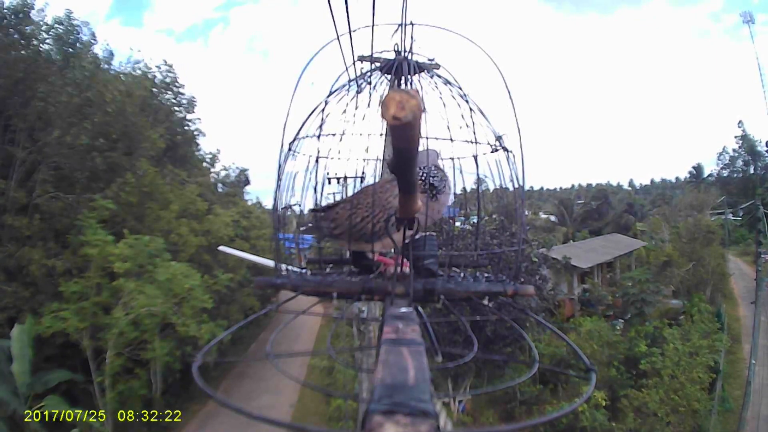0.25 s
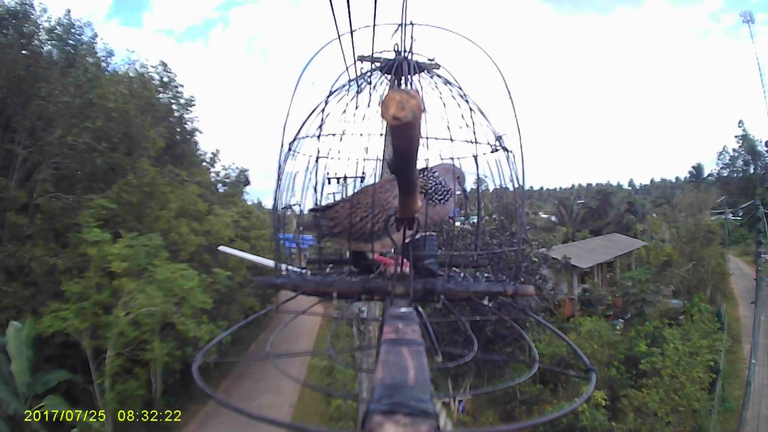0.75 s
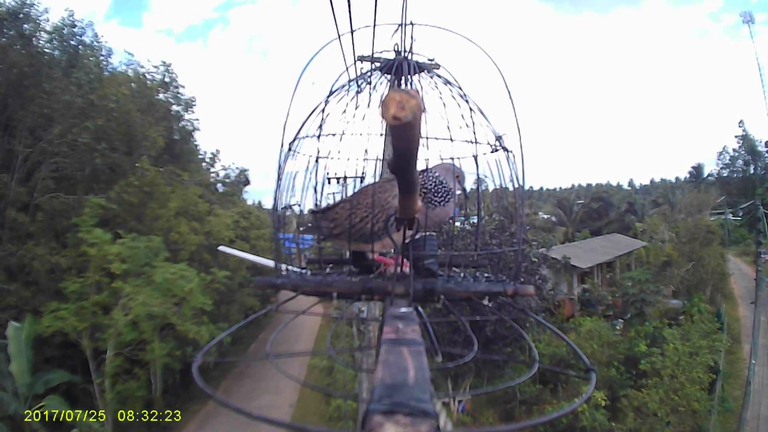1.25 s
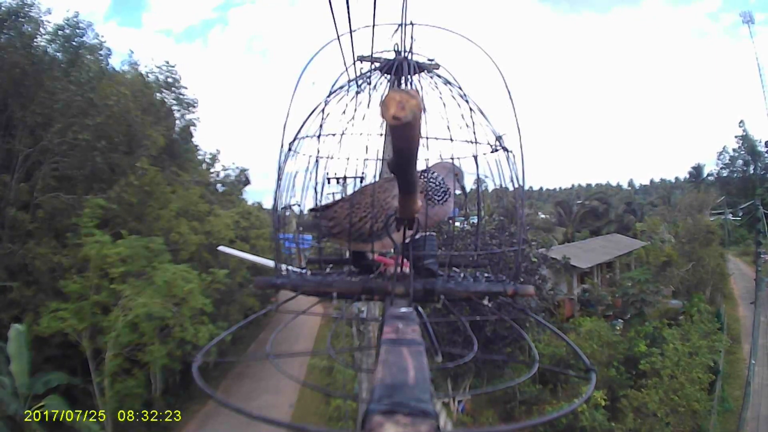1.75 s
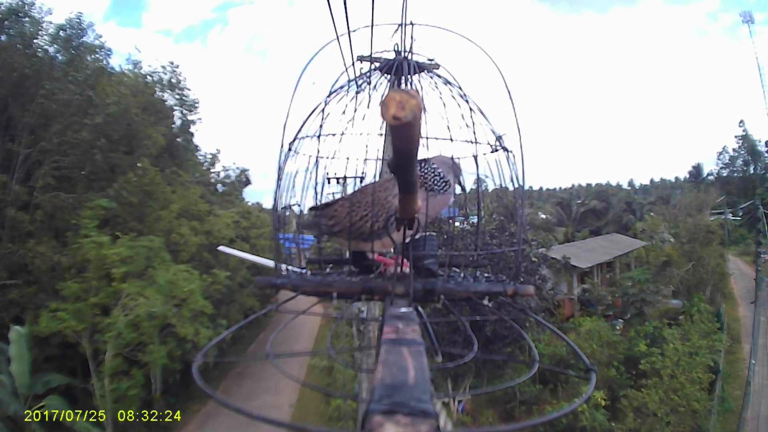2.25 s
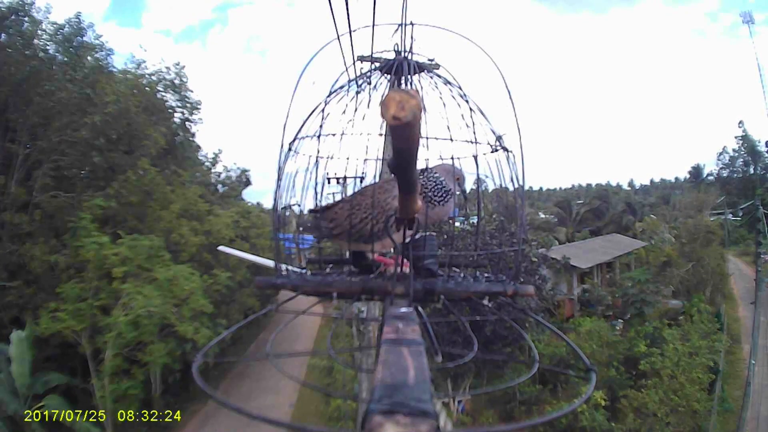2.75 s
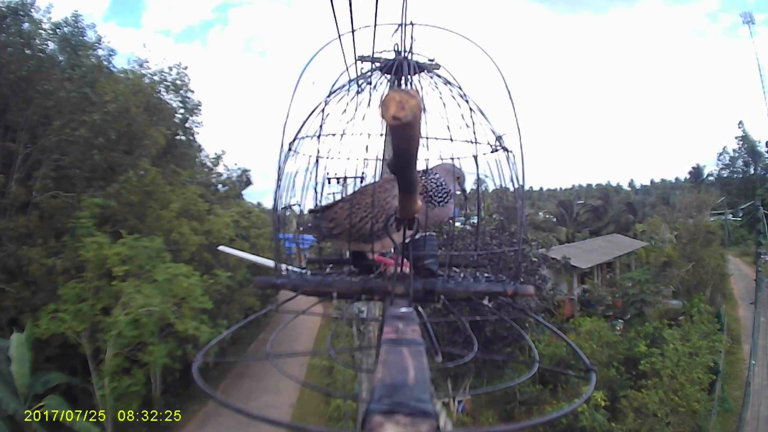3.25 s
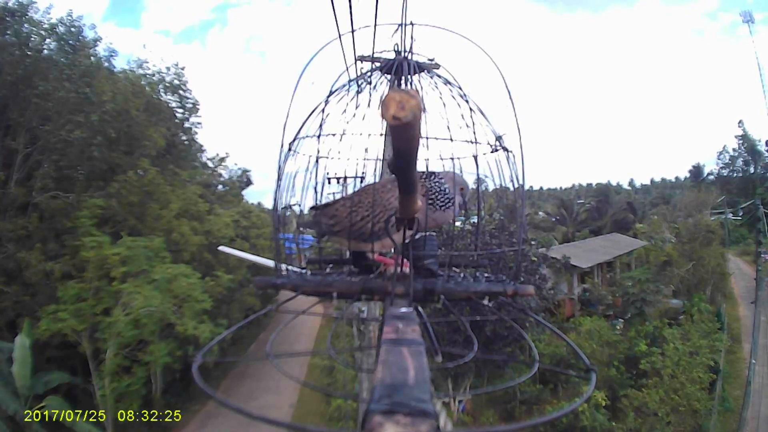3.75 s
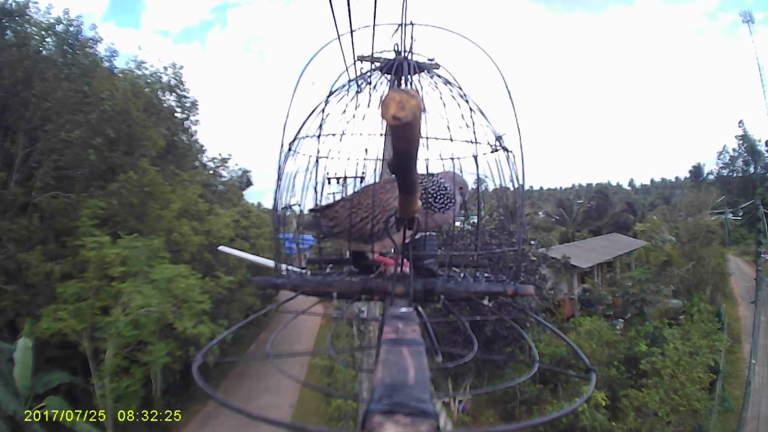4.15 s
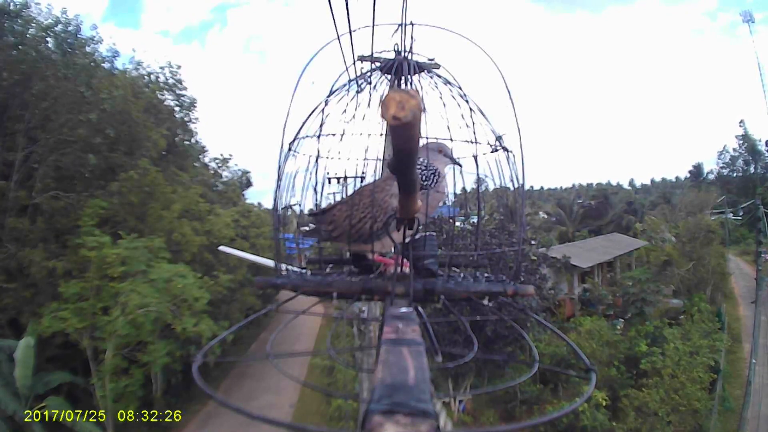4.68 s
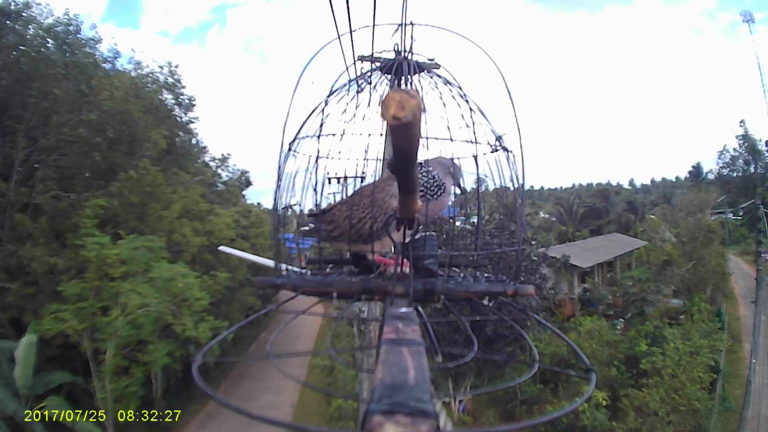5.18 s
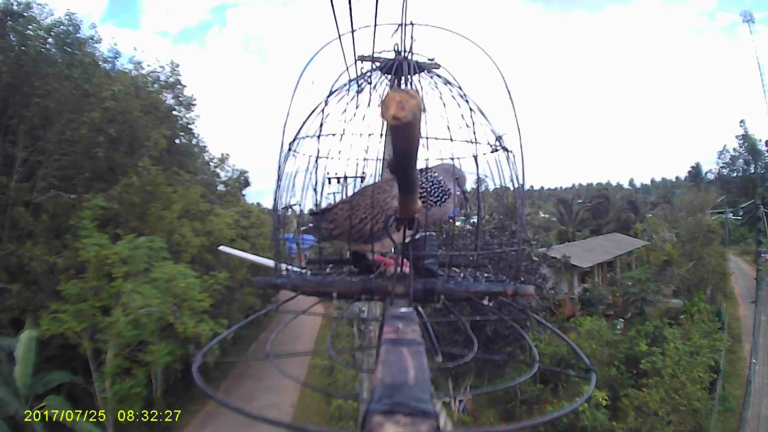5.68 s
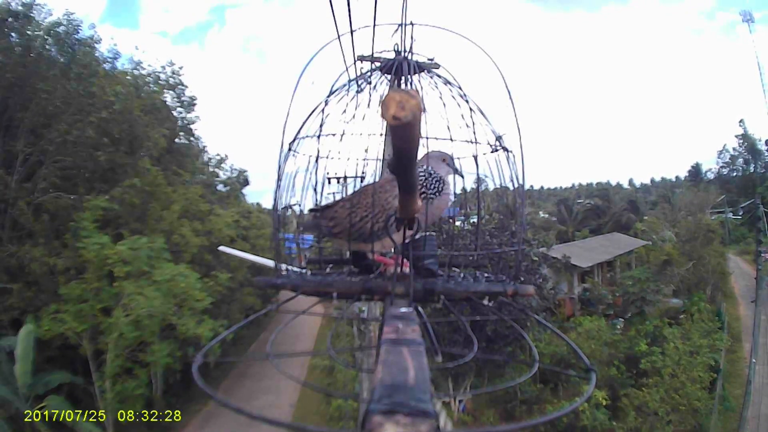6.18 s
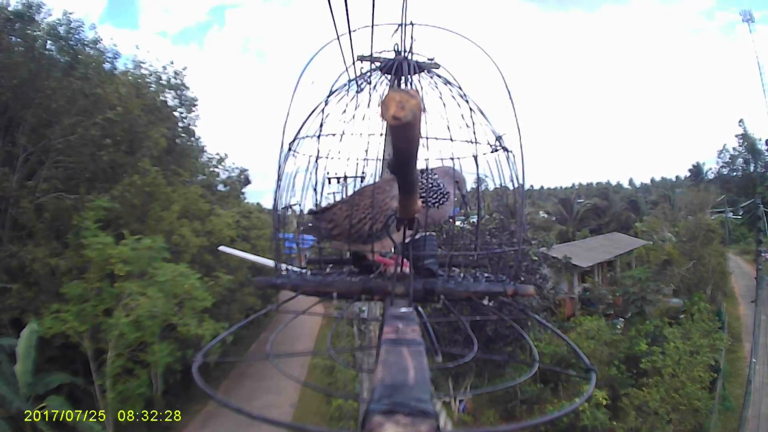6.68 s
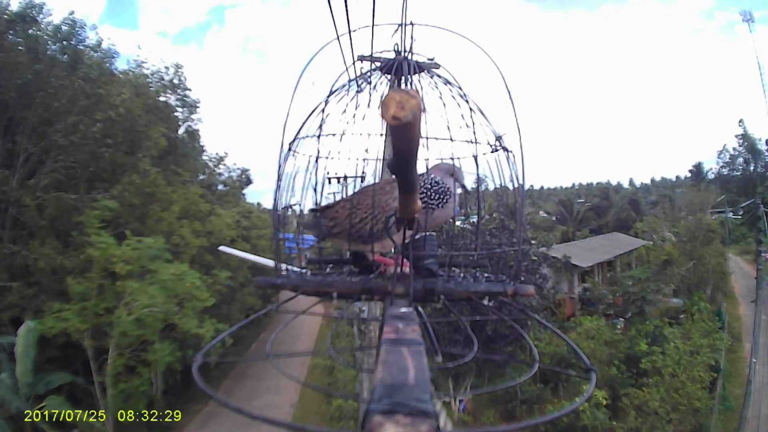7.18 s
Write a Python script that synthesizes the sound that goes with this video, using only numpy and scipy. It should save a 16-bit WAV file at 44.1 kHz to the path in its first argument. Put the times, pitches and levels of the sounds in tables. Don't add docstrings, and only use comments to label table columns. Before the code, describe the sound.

A dove's mellow, almost whistled coos come in pairs: a brief note that nearly vanishes and returns, then a longer rolling one with a rapid throb. Low wind buffets the unprotected microphone in lumpy bursts, with a calm patch early and a tearing blast just before five seconds. Soft distant bird calls, rustling foliage, and steady insect hiss lie far behind in the open air.

```python
import sys
import numpy as np
from scipy import signal
from scipy.io import wavfile
from scipy.ndimage import uniform_filter1d

SR = 44100
rng = np.random.default_rng(int(sys.argv[2]) if len(sys.argv) > 2 else 0)


def rack_gain(trim_db):
    fader = np.asarray(trim_db, float)
    return 10 ** (fader / 20)


def bounce(signal):
    frames = np.transpose(np.atleast_2d(signal))
    limited = np.clip(frames, -1, 1)
    pcm = np.round(limited * 32767).astype(np.int16)
    wavfile.write(sys.argv[1], SR, pcm)


N = 327663
COARSE = np.arange(0, N, 64)


def evened(x):
    return x / np.sqrt(np.mean(x ** 2) + 1e-20)


def smooth_rise(u):
    return .5 + .5 * np.tanh(u / 2)


def add(mix, s, sound):
    part = mix[max(round(s * SR), 0):][:len(sound)]
    part += sound[:len(part)]


def dove():
    # start [s], length [s], bright head [s], valley level [dB], closing crest [s].
    short_notes = [
        (0.78, .207, .05, -29, .03),
        (2.625, .253, .06, -37, .044),
        (3.863, .182, .034, -26, 0),
        (5.544, .255, .052, -34, .04),
        (6.872, .19, .05, -22, 0),
    ]
    # start [s], length [s], top pitch [Hz], held pitch [Hz], final fade [dB].
    long_notes = [
        (-0.195, .395, 700, 625, -18.5),
        (1.129, .391, 715, 630, -19),
        (3.033, .395, 705, 605, -16.5),
        (4.18, .346, 685, 655, -13),
        (5.952, .393, 695, 610, -18),
        (7.197, .39, 680, 670, -17),
    ]
    out, slipped = np.zeros(N), register_slips()
    for points in [dipping_note(*r) for r in short_notes] + [rolling_note(*r) for r in long_notes]:
        add(out, *coo(points, slipped))
    return out


def dipping_note(start, length, head, valley_db, crest):
    end = start + length
    breath = np.clip(crest / .02, 0, 1)
    leap_hz = 124 * breath
    close = end - .012 - .005 * (1 - breath)
    climb = min(end - .006 - crest, close - .006)
    climb_db, climb_hz = -18, 550.6
    valley_hz = 450 + 3 * (valley_db + 30)
    sink_s = min(.016 + .0022 * (valley_db + 37), .4 * length - head + .02)
    return [(start, -20.5, 680),
            (start + head - .005, -19, 672),
            (start + head, -19.8, 570),
            (start + head + sink_s, valley_db + 2, valley_hz + 30),
            (start + .5 * length, valley_db, valley_hz),
            (climb, climb_db, climb_hz),
            (climb + .005, climb_db, climb_hz + leap_hz),
            (close, climb_db - 1.5, climb_hz + .73 * leap_hz),
            (end, climb_db - 7.5 + 6 * breath, climb_hz + .8 * leap_hz - 99)]


def rolling_note(start, length, top_hz, held_hz, fade_db):
    # share of the length, share of the fade, pitch [Hz].
    dying_tail = [(.7, .07, 555), (.85, .37, 485), (1.0, 1.0, 422)]
    full_db = -18.5
    points = [(start, full_db - 6, top_hz - 100),
              (start + .027, full_db, top_hz),
              (start + .372 * length, full_db - .3, .45 * top_hz + .55 * held_hz + 8),
              (start + .62 * length, full_db + .3, held_hz)]
    for u, share, tail_hz in dying_tail:
        faded_db = share * fade_db * (fade_db / -18) ** (2 - 2 * share)
        bend_hz = 6 * share * (fade_db + 17.5) + (held_hz - 620) * (1 - share) ** 3
        points.append((start + u * length, full_db + faded_db, tail_hz + bend_hz))
    return points


def register_slips():
    # first slip [s], run length [s], dip [dB], pitch drop [Hz], time down [ms].
    runs = [(0.0126, 0, 12, 118, 12.8), (0.07, .035, 6, 80, 4), (0.915, .034, 5, 20, 7),
            (1.142, .074, 9, 130, 8.5), (1.2455, 0, 6, 98, 7.2), (1.3203, 0, 2, 105, 16.7),
            (1.3793, .07, 13, 45, 7), (2.793, .033, 9, 30, 9), (3.0497, 0, 18, 155, 7.2),
            (3.0725, .1165, 9, 130, 6.3), (3.2118, .023, 6, 105, 9), (3.257, .037, 10, 85, 10),
            (3.3106, .038, 10, 55, 7), (3.906, .116, 7, 22, 5), (4.1896, .065, 6, 100, 6.5),
            (4.279, 0, 7.7, 40, 8), (4.31, .152, 7, 105, 7.5), (5.723, .034, 5, 30, 8),
            (5.971, .102, 8.5, 105, 6), (6.0942, 0, 6, 110, 22), (6.204, .034, 6, 95, 5),
            (6.927, .116, 7, 22, 10), (7.2074, .047, 9, 105, 6.5), (7.3637, .054, 6, 115, 10)]
    rows = []
    chance = np.clip(rng.standard_normal((len(runs), 16, 4)), -2, 2)
    for (first, length, dip_db, drop_hz, down_ms), c in zip(runs, chance):
        u = np.linspace(0, 1, int(max(length, 0) / .017 + .5) + 1)
        c, many = c[:len(u)], len(u) > 1
        weaken = 1 + .2 * (1 - 2 * u) * many
        vary = weaken * np.exp(.14 * many * c[:, 1:].T)
        at = first + length * u + .0008 * np.sin(np.pi * u) * c[:, 0]
        rows += list(zip(at, dip_db * vary[0] ** 2, np.minimum(drop_hz * vary[1], 170), down_ms * vary[2]))
    return rows


def coo(points, slipped):
    # pitch [Hz], width [Hz], level over the direct tone [dB].
    crop = (555.5, 87, -1.5)
    s, effort_db, upper_hz = np.transpose(points)
    t = np.arange(max(s[0] - .015, 0), s[-1] + .007, 1 / SR)
    effort = np.interp(t, s, effort_db)

    near = [r for r in slipped if t[0] < r[0] < t[-1]]
    at, dip_db, drop_hz, down_ms = np.array(near).T[:, :, None]
    since, down = t - at, np.maximum(down_ms, 1) / 1000
    low = smooth_rise(since / .00024) * smooth_rise(5.1 * (down - since) / down)

    under_way = s[0] < .02
    scoop_hz = 0 if under_way else 120 * np.exp(-np.maximum(t - s[0], 0) / .008)
    onset = 1 if under_way else smooth_rise((t - s[0]) / .0025)
    sag_hz = 110 * smooth_rise((t - s[-1]) / .0025)
    flutter = evened(uniform_filter1d(rng.standard_normal((len(t), 2)), size=150, axis=0))
    weak = np.clip((-19.5 - effort) / 12, 0, 1)

    hz = np.interp(t, s, upper_hz) - (drop_hz * low).sum(0) - scoop_hz - sag_hz
    hz += (10 + 10 * weak) * flutter[:, 1]
    db = effort - (dip_db * np.exp(-.5 * (since / .0015) ** 2)).sum(0)
    db += (.6 + 1.6 * weak) * flutter[:, 0]
    db += 2.5 * weak * np.sin(2 * np.pi * (88 * t + rng.random()))

    angle = 2 * np.pi * np.cumsum(hz) / SR
    tone = np.sin(angle) + rack_gain(-36.5) * np.sin(2 * angle)
    direct = np.sqrt(2) * rack_gain(db) * onset * smooth_rise((s[-1] - t) / .002) * tone
    ringing = signal.lfilter(*signal.iirpeak(crop[0], crop[0] / crop[1], SR), direct)
    return t[0], direct + rack_gain(crop[2]) * ringing


def wind():
    # time [s], level [dB].
    breeze = [(0, -17.5), (.38, -24), (.48, -31), (1.3, -26.5), (1.5, -30), (2.8, -30), (2.9, -19),
              (3.64, -17.5), (3.76, -32.5), (4.0, -30), (4.3, -30), (4.77, -29), (4.88, -11), (5.25, -15),
              (6.4, -15.5), (6.68, -17), (6.75, -13), (7.43, -18)]
    # peak time [s], peak level [dB], length [s].
    big_gusts = [(0.0, -11, 0.1), (0.267, -10, 0.097), (0.356, -14, 0.052), (0.612, -18, 0.026),
                 (0.733, -11, 0.064), (1.335, -11.5, 0.075), (1.427, -16, .04), (1.78, -22.5, .06),
                 (2.02, -26.5, .15), (2.893, -15, .07), (3.062, -10.5, 0.082), (3.147, -11, .04),
                 (3.237, -6, 0.023), (3.375, -7, .04), (3.51, -11, 0.073), (3.587, -4.5, 0.037),
                 (3.66, -14, 0.035), (3.89, -18, 0.071), (3.95, -15.5, 0.18), (4.35, -26, .04),
                 (4.852, -4.5, 0.065), (5.722, -8, .06), (6.184, -10.5, 0.072), (6.353, -10.5, 0.14),
                 (6.746, -13, .06), (6.92, -8.5, 0.11), (7.033, -7.5, 0.057), (7.2, -7.5, 0.054),
                 (7.342, -6.5, .03), (7.43, -7.5, 0.058)]
    # peak time [s], peak [dB], length [s], finest whirls [dB relative].
    small_eddies = [(0.031, -15.5, 0.031, -16), (0.167, -26, 0.03, -7), (0.337, -21, 0.042, -7.5),
                    (0.742, -24, 0.085, -7.5), (1.33, -36, .06, -14), (2.95, -25.5, 0.031, -9),
                    (3.06, -21.5, 0.064, -7), (3.196, -18.5, 0.082, -7), (3.37, -17.5, 0.036, -16),
                    (3.516, -23.5, 0.087, -6), (3.601, -19.5, 0.062, -4.5), (3.927, -37.5, 0.086, 0.5),
                    (4.865, -14.5, .05, -3), (4.978, -27.5, 0.1, 8), (5.092, -25.5, 0.059, 9),
                    (5.185, -14, 0.02, -21), (5.435, -19.5, 0.13, -6.5), (5.566, -22.5, 0.086, 2),
                    (5.689, -15, 0.043, -5.5), (5.788, -14, 0.024, -4), (6.002, -20.5, .05, -7.5),
                    (6.118, -20, 0.055, 0.5), (6.217, -23, 0.062, -2.5), (6.375, -21, 0.13, -8.5),
                    (6.623, -21.5, .08, -6), (6.73, -23.5, 0.032, -19), (6.88, -21.5, 0.057, 1.5),
                    (6.96, -20.5, 0.05, -2), (7.116, -28, 0.029, 6.5), (7.232, -32, 0.034, -4)]
    last_eddy = (7.4, -17, 0.75, -4.5)
    # peak time [s], peak level [dB], length [s].
    torn_gusts = [
        (0.343, -35, .05),
        (3.454, -41, .03),
        (3.566, -30.5, 0.063),
        (4.874, -26, 0.056),
        (4.93, -27, 0.071),
        (4.987, -26.5, 0.057),
        (5.102, -44, .04),
    ]
    # frequency [Hz], density [dB per Hz].
    rumble_colour = [(3, -9), (10, 1), (25, 0), (42, -1), (60, -6), (85, -8), (120, -15), (180, -34),
                     (300, -60)]
    roar_colour = [(60, -44), (100, 8), (150, -1.5), (220, -4.5), (300, -24.5), (450, -58)]
    whirl_colour = [(150, -25.5), (240, -2.5), (320, -4), (400, -14), (500, -22), (800, -43)]
    tear_colour = [(300, -34), (430, 5), (550, -11.5), (750, -11.5), (1000, -16), (1300, -27), (2200, -57)]

    breeze_db = np.interp(COARSE / SR, *np.transpose(breeze))
    over_db = breeze_db + 30
    s, peak_db, length, fine_db = np.transpose(small_eddies + [last_eddy])
    powers = (rack_gain(breeze_db) ** 2 + swells(*np.transpose(big_gusts)),
              rack_gain(-39.5 + .85 * over_db) ** 2 + swells(s, peak_db, length),
              rack_gain(-46 + .52 * over_db) ** 2 + swells(s, peak_db + fine_db, length),
              swells(*np.transpose(torn_gusts)))
    gusting, roaring, whirling, tearing = (np.interp(np.arange(N), COARSE, np.sqrt(p)) for p in powers)

    rumble = steadied(noise(rumble_colour, .3, 1.0, size=2048), .081)
    push = .5 + uniform_filter1d(abs(rumble), size=400)
    out = gusting * rumble
    for curve, colour in ((roaring, roar_colour), (whirling, whirl_colour)):
        out += curve * steadied(push * noise(colour, .41, 1.5, size=1024), .15)
    return out + tearing * steadied(push * noise(tear_colour, .5, 3.0, size=512), .08)


def swells(s, peak_db, length):
    since = COARSE / SR - np.array(s)[:, None]
    away = np.maximum(since, -since / .7) / np.maximum(length, .005)[:, None]
    return (rack_gain(np.array(peak_db)[:, None] - 12 * away) ** 2).sum(0)


def steadied(x, seconds):
    window = np.hanning(round(seconds * SR)) * 2 / (seconds * SR)
    return x / np.sqrt(signal.oaconvolve(x ** 2, window, "same") + .058)


def noise(colour, patchy_db, lumpy_db, size):
    frames, hz = 4 * N // size + 5, np.fft.rfftfreq(size, 1 / SR)
    a, b, patches = rng.standard_normal((frames, len(hz), 3)).T
    lumps = evened(uniform_filter1d(rng.standard_normal(frames), size=3))
    patches = uniform_filter1d(patches, size=10, axis=0)
    patches = evened(uniform_filter1d(patches, size=8, axis=1))
    f, db = np.transpose(colour)
    shape = np.interp(np.log(hz + 1), np.log(f + 1), db, left=-90, right=-90)[:, None]
    z = (a + 1j * b) * rack_gain(shape + patchy_db * patches + lumpy_db * lumps)
    return evened(signal.istft(z, nperseg=size, noverlap=3 * size // 4)[1][:N])


def far_birds():
    # start [s], length [s], start pitch [Hz], end pitch [Hz], level [dB].
    far_calls = [
        (4.12, .07, 2130, 2040, -40),
        (1.86, .11, 800, 800, -43),
        (1.94, .08, 780, 780, -41),
        (2.01, .09, 780, 780, -41),
    ]
    out = np.zeros(N)
    for s, length, start_hz, end_hz, db in far_calls:
        hz = np.linspace(start_hz, end_hz, round(length * SR))
        a, b = evened(uniform_filter1d(rng.standard_normal((2, N // 8)), size=500))[:, :len(hz)]
        blurred = (1.2 + .7 * (a + 1j * b)) * np.exp(2j * np.pi * np.cumsum(hz) / SR)
        add(out, s, rack_gain(db) * blurred.real * np.hanning(len(hz)))
    return out


def background():
    # frequency [Hz], density [dB per Hz].
    leaf_colour = [(120, -44), (200, 0.5), (226, 5.5), (258, -6), (342, -4.5), (600, -4), (630, -2),
                   (775, -5), (865, -5), (1130, -5.5), (1310, -16.5), (2110, -7.5), (3700, -27),
                   (4810, -50), (8140, -120)]
    # frequency [Hz], density [dB per Hz].
    hiss_colour = [(2060, -12), (3500, -16.5), (4040, -10), (4460, -3.5), (5120, -10), (5700, -1.5),
                   (6740, 1), (8550, -12.5), (9500, -12), (10700, -16.5), (10900, -16), (11700, -16.5),
                   (14000, -15.5), (14900, -18), (15600, -23)]
    # frequency [Hz], level [dB].
    whine_tones = [(11200, -70.5), (11175, -81), (11225, -82), (11150, -84), (11250, -84)]
    t = np.arange(N) / SR
    whine = np.zeros(N)
    for hz, db in whine_tones:
        whine += np.sqrt(2) * rack_gain(db) * np.sin(2 * np.pi * (hz * t + rng.random()))
    hiss = rack_gain(-47.23 - .25 * t) * noise(hiss_colour, .2, .15, size=512)
    leaves = rack_gain(-37) * noise(leaf_colour, .28, .24, size=1024)
    return leaves + hiss + whine


def scene():
    return (dove() + wind() + far_birds() + background())[None]


def top_cut(x):
    return signal.sosfilt(signal.butter(12, 15710, fs=SR, output="sos"), x)


def record(dry):
    x = dry + .026
    ceiling = .95
    knee = .65 * ceiling
    room = ceiling - knee
    over = np.maximum(abs(x) - knee, 0)
    mix = np.sign(x) * (np.minimum(abs(x), knee) + room * np.tanh(over / room))
    return top_cut(mix)


dry = scene()
out = record(dry)
bounce(out)
```